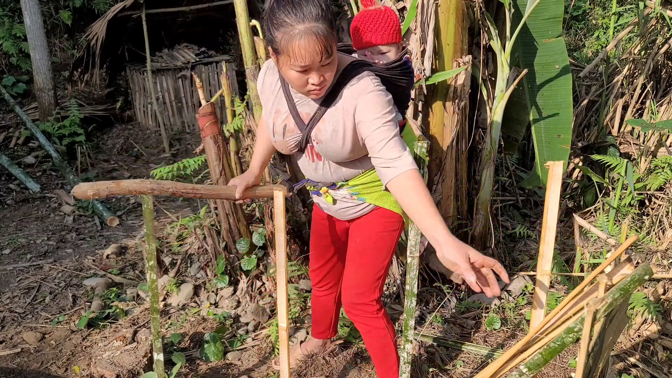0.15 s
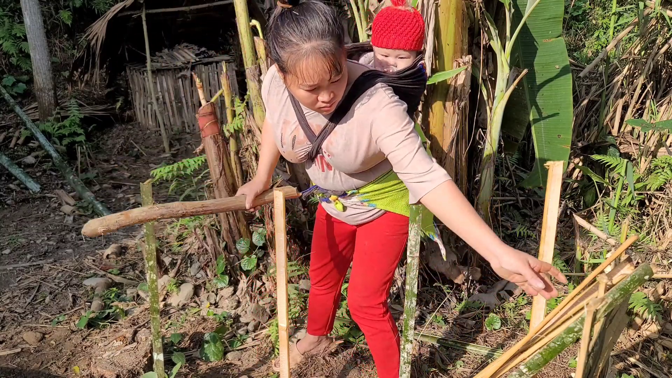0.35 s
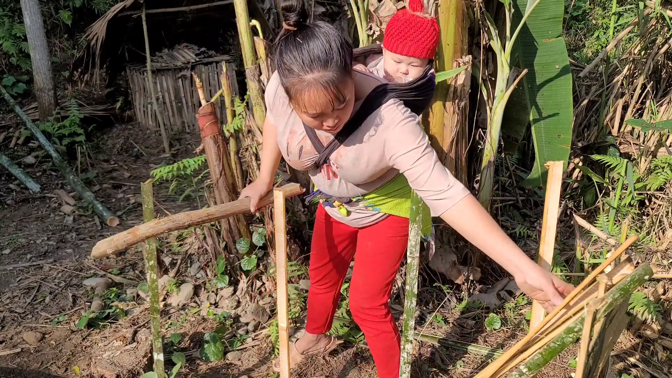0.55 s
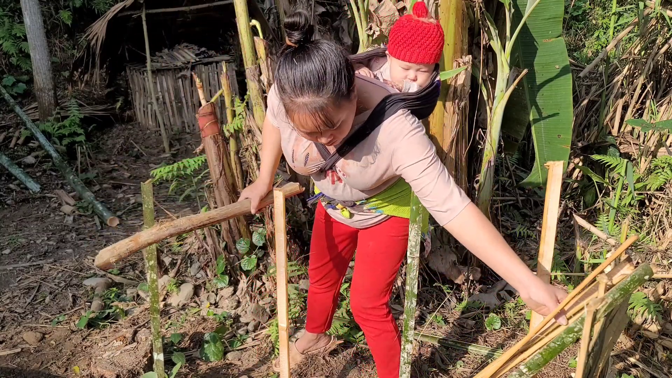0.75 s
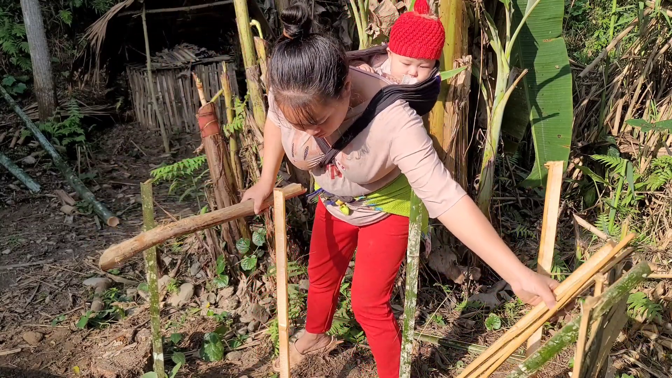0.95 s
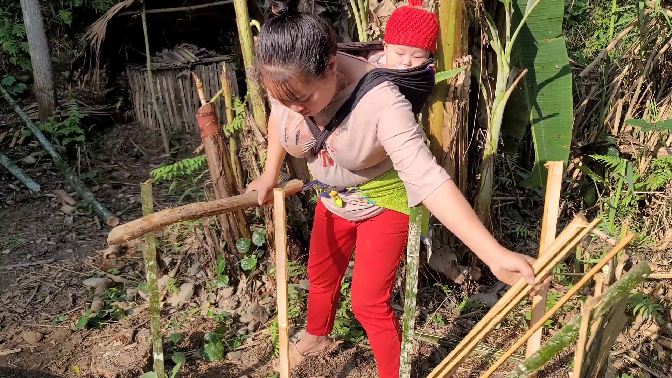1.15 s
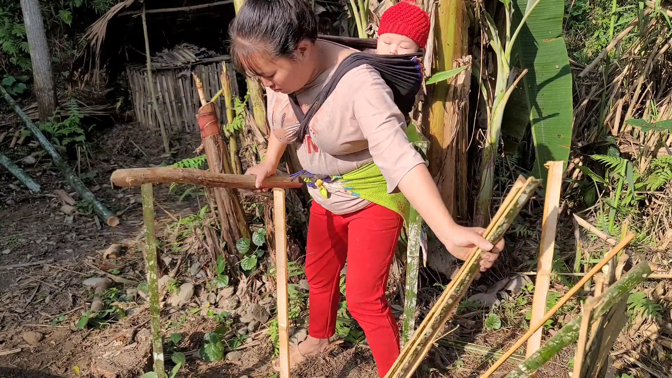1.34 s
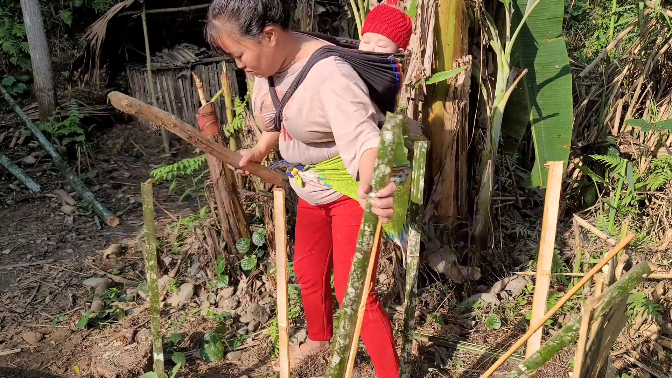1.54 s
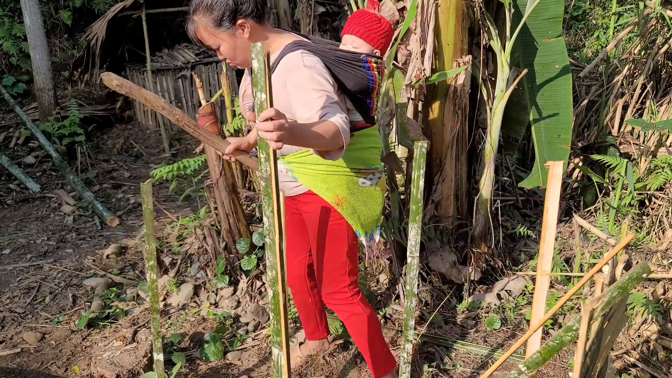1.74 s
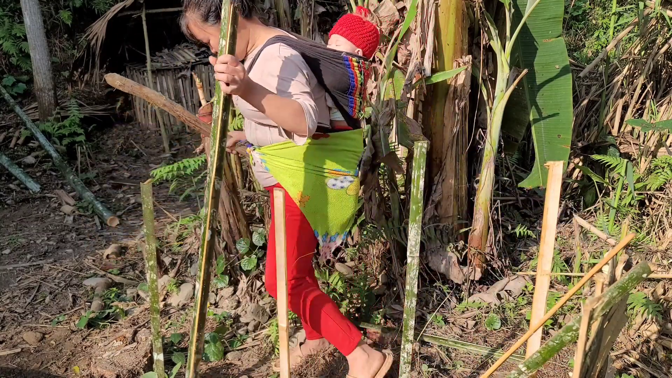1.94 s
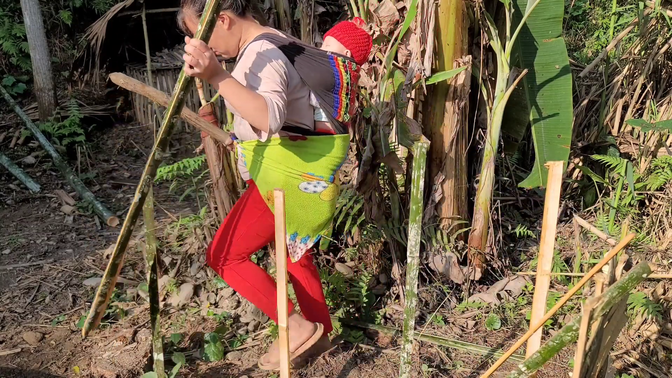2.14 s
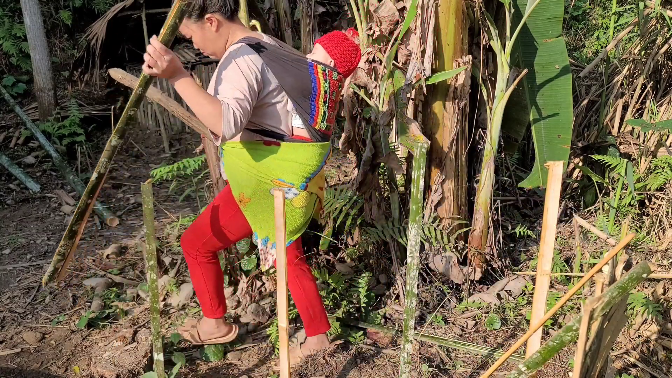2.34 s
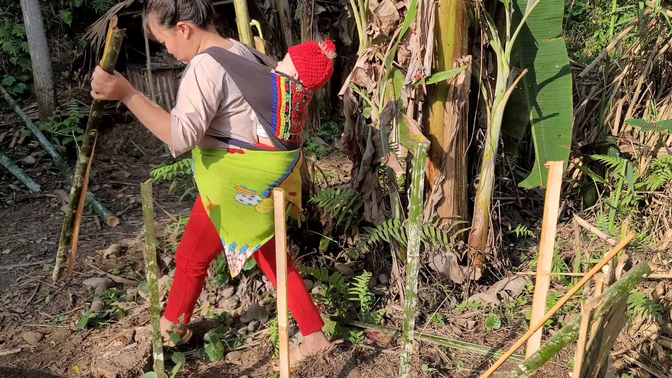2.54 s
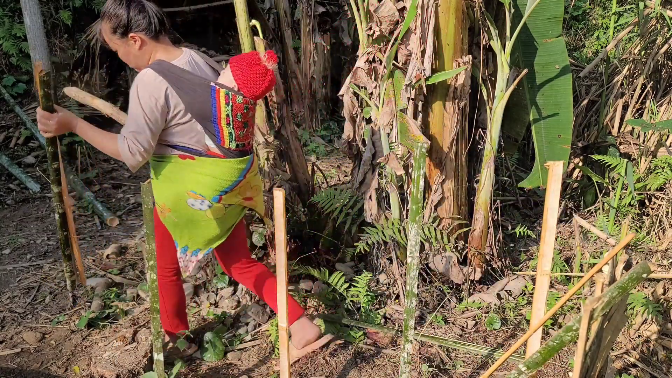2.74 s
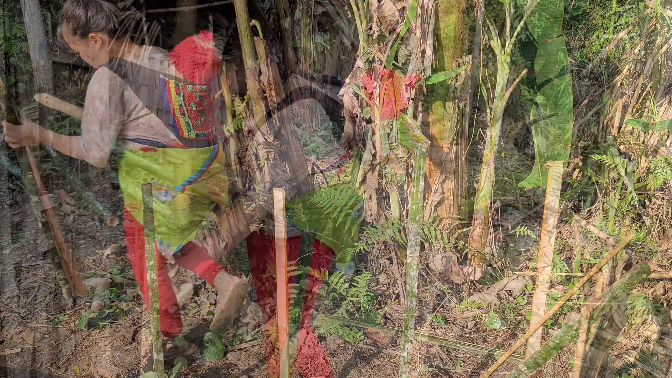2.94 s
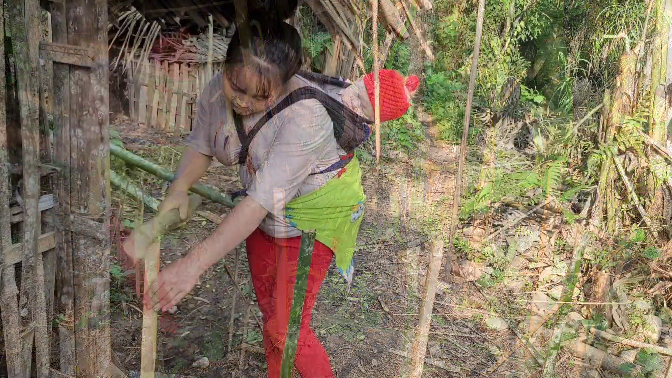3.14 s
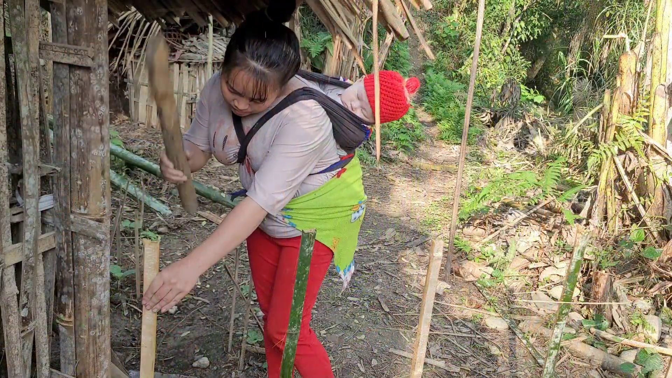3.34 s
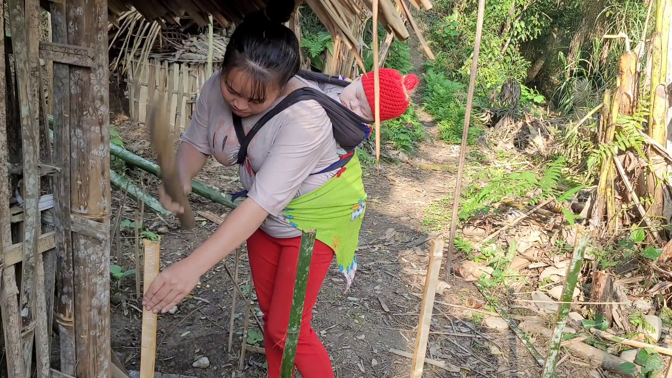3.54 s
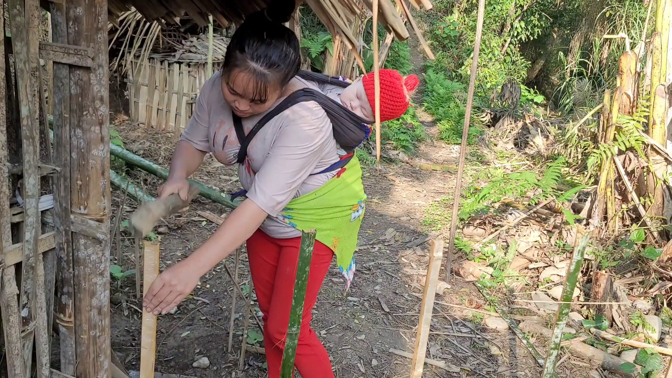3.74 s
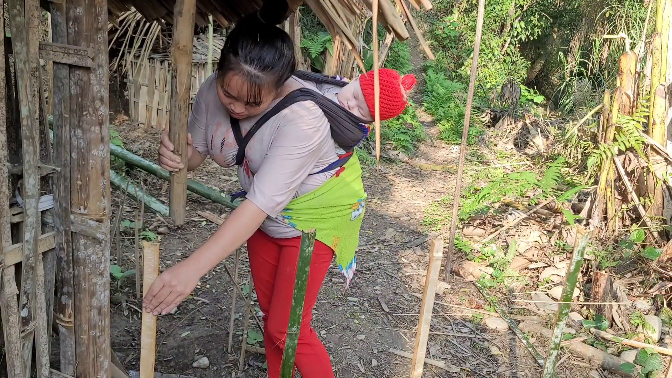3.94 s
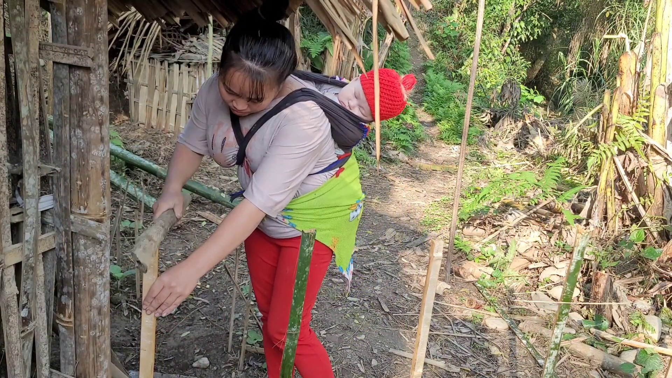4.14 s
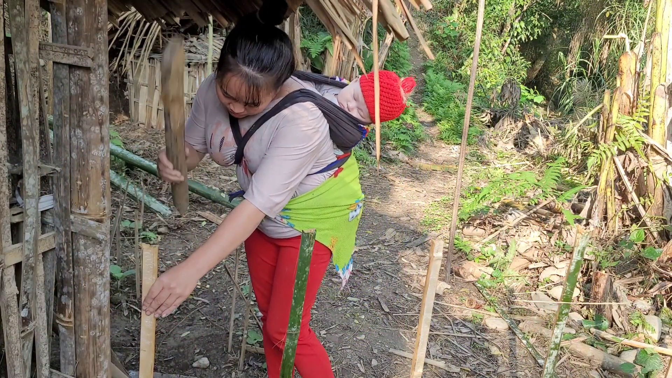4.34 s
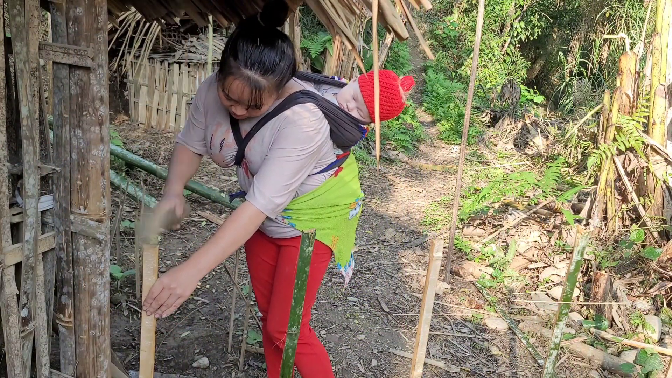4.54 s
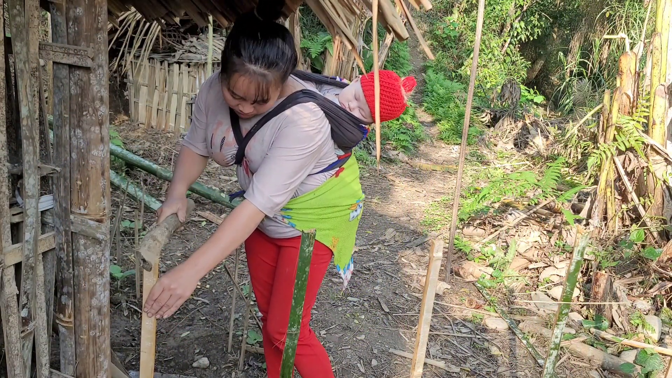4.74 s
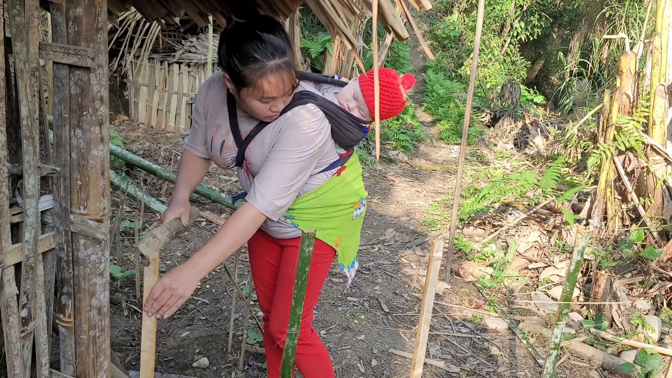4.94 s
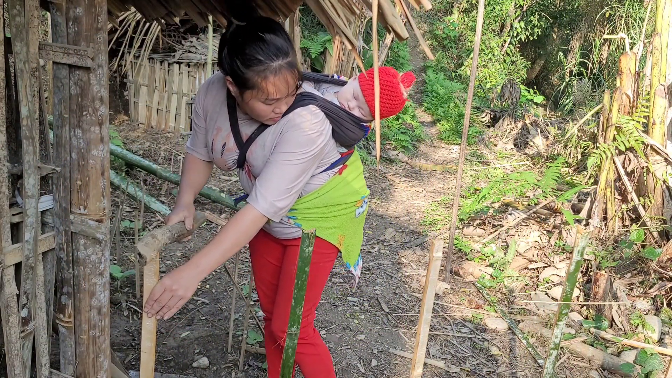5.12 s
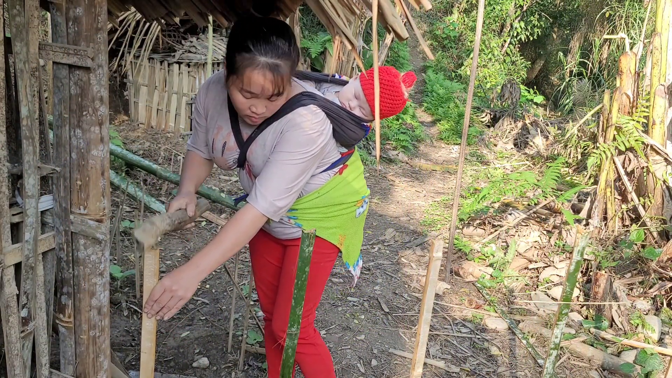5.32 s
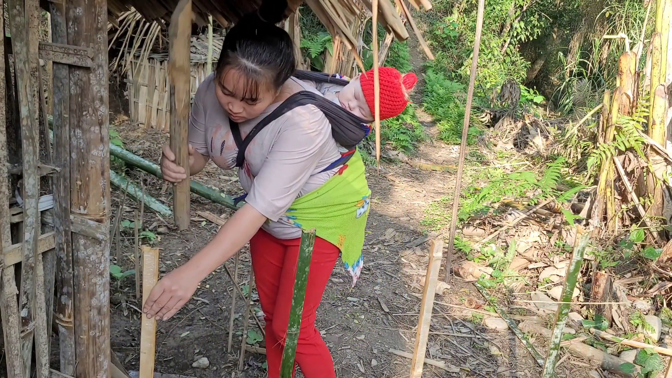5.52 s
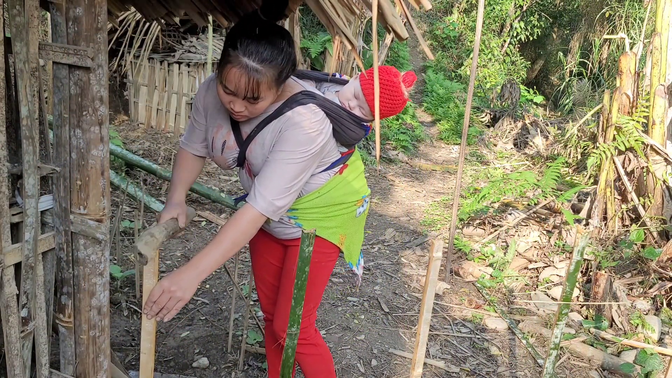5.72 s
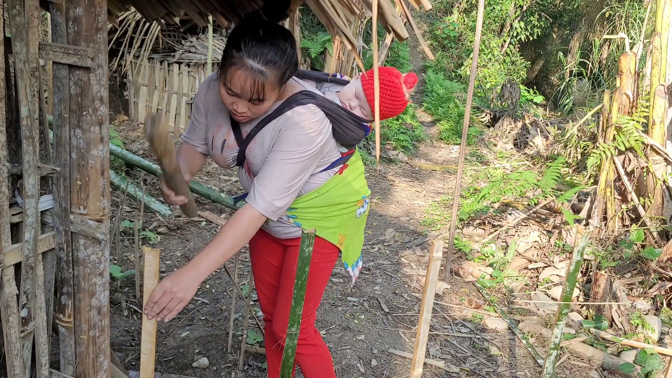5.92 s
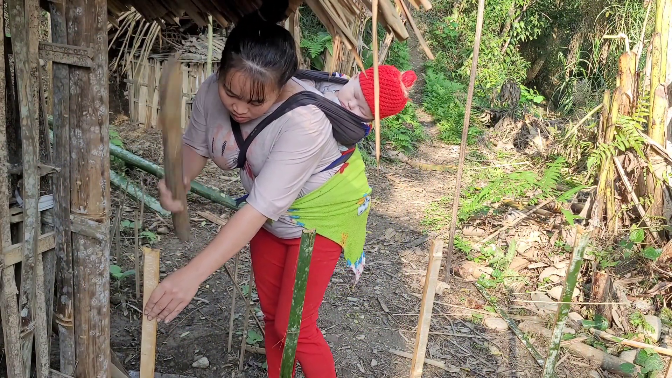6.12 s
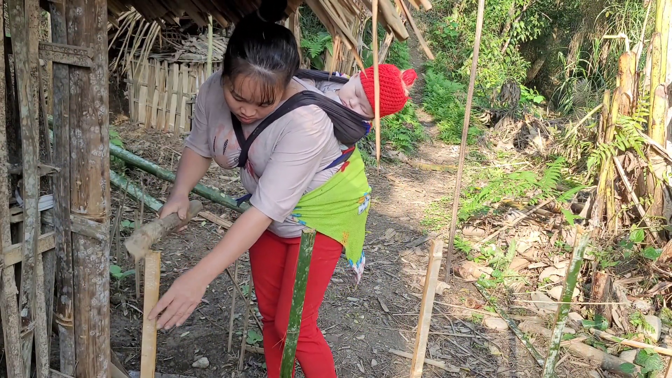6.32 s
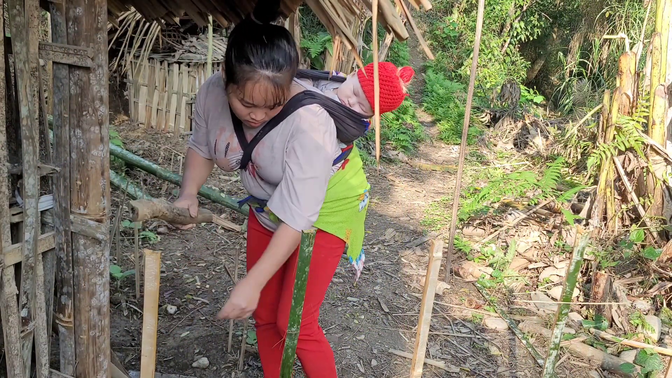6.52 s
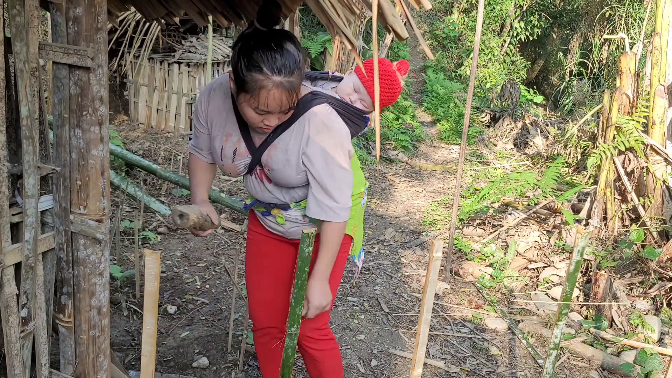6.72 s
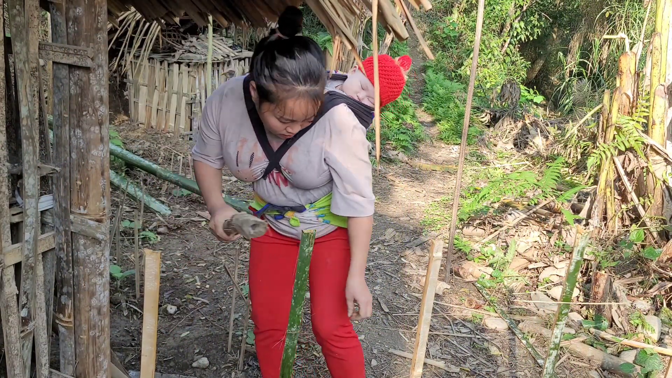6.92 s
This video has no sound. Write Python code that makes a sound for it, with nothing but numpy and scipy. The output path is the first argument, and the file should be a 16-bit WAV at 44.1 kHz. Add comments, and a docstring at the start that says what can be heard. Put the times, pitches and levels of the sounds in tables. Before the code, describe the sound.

Outdoors with thin insect shrilling, dry leaves and slats crackle lightly before four hollow club knocks, a pause, and two more.

```python
"""Beside a hut at the forest's edge, a bamboo stake is driven into the earth with a heavy wooden club.
First a slat is pulled from a pile and carried over dry leaves: noise swells, short bursts and ringing modes.
Then come six blows, four and two: deep knock, ringing modes, the stake's note, cracking fibres and reflections.
Insects shrill all the while as throbbing band noise over low air noise; faint whistled tones lie far off."""
import sys
import numpy as np
from scipy import signal
from scipy.fft import rfft, irfft, next_fast_len
from scipy.io import wavfile
from scipy.ndimage import uniform_filter1d

SR = 44100
rng = np.random.default_rng(int(sys.argv[2]) if len(sys.argv) > 2 else 0)


def materialize(psi):
    """Save the field psi as 16-bit PCM at rate SR to the path in sys.argv[1].

    A 1-D psi becomes a single channel; in a 2-D psi each row is a channel.
    """
    bounded = np.clip(np.atleast_2d(psi).T, -1, 1)
    quanta = np.round(bounded * 32767).astype(np.int16)
    wavfile.write(sys.argv[1], SR, quanta)


N = 307371
TIME = np.arange(N) / SR
AGE = np.arange(SR // 2) / SR   # s since a contact

# blows of the club: start_s, strength_db, note_hz, note_db (re strength), sharpness_db
BLOWS = [(3.049, -11.5, 1102, -10, 0.7), (3.542, -5.5, 913, -8, 0.35), (4.033, -5, 892, -1.5, 2.5),
         (4.518, -4, 904, -1, 1), (5.6864, -5, 902, -1.5, -0.1), (6.146, -6.5, 906, -7, -0.95)]


def from_db(db):
    """Decibels to gain."""
    return 10 ** (np.asarray(db) / 20)


def rms_one(x):
    """Scale to rms 1."""
    return x / np.sqrt(np.mean(x ** 2) + 1e-20)


def at_hz(points, hz, axis=1):
    """Interpolate a table column on a log-frequency axis."""
    points = np.array(points)
    return np.interp(np.log(np.maximum(hz, 1)), np.log(points[:, 0]), points[:, axis])


def dying(t60_s):
    """Exponential decay of 60 dB in t60_s."""
    return np.exp(-np.log(1000) * AGE / t60_s)


def add(out, start_s, sound):
    """Mix a sound in at start_s."""
    start = round(start_s * SR)
    out[:, start:start + sound.shape[-1]] += sound[..., :N - start]


def drift(rate_hz):
    """Random wander of rms 1: straight lines between rate_hz random knots a second."""
    knots = rng.standard_normal(4096)
    return rms_one(np.interp(TIME * rate_hz, np.arange(len(knots)), knots))


def swell(peak_s, rise_s, fade_s):
    """A smooth hump of gain, 1 at peak_s."""
    edge_db = -15.5   # one rise_s before or one fade_s after the peak
    away = np.where(TIME < peak_s, (peak_s - TIME) / rise_s, (TIME - peak_s) / fade_s)
    return from_db(edge_db * np.minimum(away, 4) ** 2)


def lean(x, pan_db):
    """Make the left channel pan_db stronger than the right."""
    return x * from_db([[pan_db / 2], [-pan_db / 2]])


def place(x, pan_db, lag_s):
    """Pan a mono sound in level and delay its right channel."""
    delayed = np.interp(AGE - lag_s, AGE, x, left=0)
    return lean(np.array([x, delayed]), pan_db)


def noise(spectrum, size=N, likeness=None):
    """Stereo noise of rms 1: the table sets its colour, mid and side shares its left-right likeness."""
    # default left-right correlation: frequency_hz, likeness (-1 to 1)
    default_likeness = [(60, 0.9), (130, 0.6), (290, 0.05), (640, -0.52), (1000, -0.51), (1400, -0.028),
                        (3100, 0), (5400, -.15), (8000, 0.11), (16000, -0.31)]
    hz = np.maximum(np.fft.rfftfreq(size, 1 / SR), 1)
    mid, side = rfft(rng.standard_normal((2, size)))
    alike = np.clip(at_hz(likeness or default_likeness, hz), -1, 1)
    pair = np.sqrt(1 + alike) * mid + np.sqrt(1 - alike) * side * [[1], [-1]]
    # fall away beyond the ends of the table
    ends = np.minimum(1, np.minimum(hz / spectrum[0][0], spectrum[-1][0] / hz)) ** 6
    return rms_one(irfft(pair * ends * from_db(at_hz(spectrum, hz)), size))


def steady(spectrum):
    """Coloured noise that lasts the whole scene."""
    return noise(spectrum, size=next_fast_len(N))[:, :N]


def ring(modes, rise_s):
    """Modes swell in and die exponentially; each excitation varies their levels and pitches a little."""
    chance = rng.standard_normal((len(modes), 2)) * [1.0, .005]   # dB, fraction of pitch
    out = np.zeros(len(AGE))
    for k, ((hz, db, t60_s), (extra_db, detune)) in enumerate(zip(modes, chance)):
        sine = np.sin(2 * np.pi * hz * (1 + detune) * AGE)
        out += (-1) ** k * from_db(db + extra_db) * dying(t60_s) * sine
    return out * (1 - np.exp(-(AGE / rise_s) ** 2))


def chirr(rate_hz, depth):
    """Three insects throb at slightly different, wandering rates; gain of rms 1."""
    rates_hz = rate_hz * (1 + .15 * rng.standard_normal(3))
    throbs = np.zeros(N)
    for insect_hz in rates_hz:
        wandering_hz = insect_hz * (1 + .08 * drift(6))
        throbs += np.sin(2 * np.pi * np.cumsum(wandering_hz) / SR)
    return rms_one(np.exp(depth * throbs))


def outdoors():
    """Air noise and insect chorus at the pile, crossfaded at the scene cut to those at the hut."""
    # noise colours: frequency_hz, relative_db
    air_pile, air_hut = [(15, -51), (25, -34.5), (40, -5.5), (64, 3.5), (119, 0.5), (158, -10.5),
                         (267, -14), (362, -4.5), (535, -6.5), (597, -3), (962, -11.5), (1300, -6.5),
                         (3040, -12.5), (4500, -14), (5850, -64.5), (9900, -120)], [(15, -54), (25, -17), (76, -1.5), (304, -26), (395, -19),
                                           (512, -20), (665, -17), (941, -28), (1330, -20.5), (1490, -28),
                                           (1660, -20.5), (2010, -25), (2610, -25.5), (3470, -26),
                                           (4500, -26), (5850, -63.5), (9900, -120)]
    insects_pile, insects_hut = [(4300, -22.5), (4750, -22), (5000, -12), (5280, -1), (5520, -1),
                                 (5750, -14.5), (6030, -12.5), (6600, -24.5), (8000, -31.5), (9500, -39),
                                 (11000, -34), (12500, -40.5), (16000, -57.5)], [(4300, -25.5), (4750, -20), (5000, -6), (5230, 0),
                                                       (5480, 1.5), (5680, -4.5), (5850, -13.5),
                                                       (6400, -23), (7300, -22.5), (9300, -35),
                                                       (11000, -31), (12500, -36.5), (16000, -37.5)]
    # chorus level before the gain of each place: time_s, level_db
    chorus_curve = [(0.0, -59.5), (0.21, -58.5), (1.96, -57.5), (2.33, -57.5), (3.03, -62), (4.08, -61),
                    (4.76, -62), (6.97, -62)]
    air_pile_db, air_hut_db = -70, -66
    insects_pile_db, insects_hut_db = 2, 3   # re chorus level
    cut_s, crossfade_s = 3.084, 0.23
    past_cut = np.clip((TIME - cut_s) / crossfade_s + .5, 0, 1)
    chorus_db = np.interp(TIME, *np.transpose(chorus_curve))
    shrill = from_db(chorus_db + .9 * drift(25)) * chirr(rate_hz=50, depth=0.055)
    pile = from_db(air_pile_db) * steady(air_pile)
    pile = pile + from_db(insects_pile_db) * shrill * steady(insects_pile)
    hut = from_db(air_hut_db) * steady(air_hut)
    hut = hut + from_db(insects_hut_db) * shrill * steady(insects_hut)
    return np.sqrt(1 - past_cut) * lean(pile, pan_db=-2.4) + np.sqrt(past_cut) * lean(hut, pan_db=-2.0)


def tone(hz, waver, flutter_db, waver_rate_hz=100):
    """A sine whistle, unsteady in pitch and level, that reaches the right channel later."""
    lag_s = .00026
    phase = 2 * np.pi * np.cumsum(hz * (1 + waver * drift(waver_rate_hz))) / SR
    pair = np.sin([phase, phase - 2 * np.pi * hz * lag_s])
    return from_db(flutter_db * drift(32)) * np.sqrt(2) * pair


def far_chirp():
    """A thin high chirp arches in pitch and level."""
    peak_s, edge_s, top_hz, drop_hz, level_db = .48, 0.13, 11030, 300, -76.5
    arch = swell(peak_s, edge_s, edge_s)
    return from_db(level_db) * arch * tone(top_hz - drop_hz * (1 - arch), waver=.006, flutter_db=1.0)


def far_tones():
    """A faint whine and a lower hum swell and fade while their pitch sinks."""
    # peak_s, rise_s, fade_s, pitch_hz (at the peak), sag_hz_per_s, level_db
    tone_rows = [(3.9, 1.1, 2.8, 1425, 62, -76.5), (3.6, 1.5, 1.5, 750, 15, -82.5)]
    out = np.zeros((2, N))
    for peak_s, rise_s, fade_s, hz, sag, db in tone_rows:
        sinking_hz = hz - sag * (TIME - peak_s)
        out += from_db(db) * swell(peak_s, rise_s, fade_s) * tone(sinking_hz, waver=.016, flutter_db=5.0)
    return out


def peeps():
    """Brief faint peeps from the forest, each a wavering whistle that falls in pitch."""
    # peak_s, pitch_hz (at the peak), level_db
    peep_rows = [(.47, 2300, -78), (2.26, 2200, -67), (3.47, 2920, -72.5), (5.34, 1605, -69),
                 (5.89, 2570, -71), (6.57, 2640, -65), (6.9, 1600, -72)]
    rise_s, fade_s, sag_hz_per_s = 0.031, 0.057, 7300
    out = np.zeros((2, N))
    for peak_s, hz, db in peep_rows:
        falling_hz = hz - sag_hz_per_s * (TIME - peak_s)
        whistle = tone(falling_hz, waver=.06, flutter_db=3.0, waver_rate_hz=500)
        out += from_db(db) * swell(peak_s, rise_s, fade_s) * whistle
    return out


def rustle():
    """With each movement dry leaves and slats crackle unevenly; feet and clothes scuff below them."""
    # noise colours: frequency_hz, relative_db
    crisp_colour, scuff_colour = [(2500, -11), (5000, -3), (7500, -2), (10000, -14), (15000, -12)], [(300, 4.5), (900, -3.5), (1400, 3), (2200, -1), (4500, -3),
                                                 (7000, -5)]
    # movements: peak_s, rise_s, fade_s, crisp_db, scuff_db
    move_rows = [(.07, 0.24, 0.11, -75, -73), (.62, 0.66, 0.096, -80, -66.5),
                 (.82, 0.15, 0.07, -65.5, -68.5), (1.17, 0.27, 0.12, -70, -70.5),
                 (1.36, 0.051, 0.097, -57.5, -69.5), (1.43, 0.03, .25, -74, -67.5),
                 (1.86, 0.67, 0.23, -84, -70), (2.35, 0.37, 0.39, -80, -70.5),
                 (2.63, 0.05, 0.066, -63, -69), (2.769, 0.061, .13, -71, -67.5),
                 (6.57, 0.024, 0.2, -81, -73), (6.89, .18, 0.24, -78, -67)]
    crisp = steady(crisp_colour) * rms_one(from_db(5.0 * drift(500)))
    scuff = steady(scuff_colour) * rms_one(from_db(2.0 * drift(200)))
    out = np.zeros((2, N))
    for peak_s, rise_s, fade_s, crisp_db, scuff_db in move_rows:
        both = from_db(crisp_db) * crisp + from_db(scuff_db) * scuff
        out += swell(peak_s, rise_s, fade_s) * both
    return out


def taps():
    """Knocks and snaps of slats and twigs: noise bursts round a pitch, with a faint tail from around."""
    # start_s, level_db, pitch_hz, width_octaves, t60_s
    tap_rows = [(0.79, -47, 825, 1.5, 0.071), (0.7931, -40.5, 2350, 0.83, 0.029),
                (0.82, -55, 11100, 0.26, 0.014), (.863, -60.5, 9000, 1, 0.0091),
                (1.334, -65, 8000, .7, .02), (1.416, -54.5, 4970, 1.2, 0.073),
                (1.549, -61.5, 10100, 0.44, 0.0078), (1.824, -62, 5000, 1.9, 0.026),
                (2.364, -57, 3000, 1.3, 0.027), (2.603, -57.5, 1000, 1.03, 0.41),
                (3.667, -59, 6940, 1.5, 0.014), (5.265, -61, 2980, 1.5, 0.024),
                (6.235, -58, 8000, 0.91, 0.011), (6.862, -61, 5000, 1.43, 0.026)]
    out = np.zeros((2, N))
    for start_s, db, hz, width, t60_s in tap_rows:
        colour = [(hz * 2 ** (k * width), -6 * k * k) for k in (-2, -1, 0, 1, 2)]
        envelope = dying(t60_s) + from_db(-14) * dying(0.3)
        add(out, start_s, from_db(db) * noise(colour, size=len(AGE)) * envelope)
    return out


def slat():
    """Slats and sticks touch: a free length of bamboo rings briefly on one mode."""
    # start_s, level_db, pitch_hz, t60_s
    ring_rows = [(.66, -59, 1245, 0.053), (1.461, -44, 1920, 0.02), (1.545, -55.5, 1164, 0.085),
                 (2.729, -59, 1380, 0.082), (2.818, -57, 1700, 0.027)]
    out = np.zeros((2, N))
    for start_s, db, hz, t60_s in ring_rows:
        note = ring([(hz, db, t60_s)], rise_s=0.0011)
        add(out, start_s, place(note, pan_db=-5.0, lag_s=.00003))
    return out


def scatter(build_s, ragged_db):
    """Diffuse tail from hut, ground and plants: it builds up in milliseconds, dies unevenly band by band."""
    # frequency_hz, relative_db, t60_s
    tail_bands = [(45, -1.5, 0.31), (130, -2, .18), (308, -4.5, 0.2), (444, 3, 0.22), (594, -3, 0.2),
                  (830, -1.5, 0.1654), (1080, -11, 0.2), (1550, -12, 0.16), (1716, -3.5, 0.1),
                  (1992, -11.5, 0.13), (4050, -20, 0.16), (7050, -25, 0.13), (10025, -34, .15),
                  (16000, -42, 0.13)]
    edges_hz = np.geomspace(30, 17000, 25)
    bins_hz = np.fft.rfftfreq(len(AGE), 1 / SR)
    spectrum = rfft(noise(tail_bands, size=len(AGE)))
    lumps = uniform_filter1d(rng.standard_normal((len(edges_hz), len(AGE))), size=300, mode="wrap")
    tail = np.zeros((2, len(AGE)))
    for low, high, lump in zip(edges_hz, edges_hz[1:], lumps):
        band = irfft(spectrum * ((bins_hz >= low) & (bins_hz < high)), len(AGE))
        decay = dying(at_hz(tail_bands, np.sqrt(low * high), axis=2))
        tail += band * decay * rms_one(from_db(ragged_db * rms_one(lump)))
    return tail * (1 - np.exp(-(AGE / build_s) ** 2))


def yard(direct):
    """What comes back after each blow: diffuse scatter, a lingering hollow ring and an echo off the hut."""
    # hollow ring: frequency_hz, level_db, t60_s
    hollow_modes = [(379, -40.5, .29), (440, -41, .29)]
    # echo off a wall of the hut: delay_s, left_db, right_db
    echo_rows = [(0.042, -33, -25.5)]
    scatter_db = -16   # re strength
    out = np.zeros((2, N))
    for start_s, strength_db, *_ in BLOWS:
        tail = from_db(scatter_db) * scatter(build_s=0.003, ragged_db=1.3)
        hollow = place(ring(hollow_modes, rise_s=0.017), pan_db=1.0, lag_s=.0004)
        add(out, start_s, from_db(strength_db) * (tail + hollow))
    for delay_s, left_db, right_db in echo_rows:
        add(out, delay_s, direct * from_db([[left_db], [right_db]]))
    return out


def thump(centre_s, hz):
    """The stake lurches into the soil and stops: the inverted second derivative of a smooth push."""
    u = (np.pi * hz * (AGE - centre_s)) ** 2
    return (1 - 2 * u) * np.exp(-u)


def crunch(contact_s, t60_s, grain_db):
    """Crushed fibres crunch as grainy noise, held for the contact and then dying."""
    # colour: frequency_hz, relative_db
    fibre_colour = [(800, -0.5), (2200, 4), (2700, -10), (3300, -4), (4200, -2), (5600, -4), (7200, -8.5),
                    (9000, -15.5), (11000, -25), (16000, -19.5)]
    # left-right correlation: frequency_hz, likeness (-1 to 1)
    fibre_likeness = [(1000, 0.32), (2500, -.5), (7000, -.25), (12000, -0.12)]
    wander = uniform_filter1d(rng.standard_normal(len(AGE)), size=16) * np.sqrt(16)
    grains = rms_one(from_db(grain_db * wander))
    hold = np.minimum(1, dying(t60_s) * np.exp(np.log(1000) * contact_s / t60_s))
    onset = 1 - np.exp(-AGE / 0.0007)
    return noise(fibre_colour, size=len(AGE), likeness=fibre_likeness) * grains * hold * onset


def blows():
    """Each blow: a deep knock into the ground, body modes, the stake's note, bamboo clack and fibre crack."""
    # modes of stake and club, and of the bamboo wall: frequency_hz, relative_db, t60_s
    body_modes, wall_modes = [(55, -24, 0.17), (111, -11, .126), (179.3, -2.5, .068), (225, -2.5, 0.032),
                              (353.6, 3.5, 0.015), (397.6, 9, 0.023), (511, 0.5, 0.05), (412, -13.5, .16),
                              (596.4, -1.5, 0.044), (706.4, -2, 0.0422)], [(1115, 18.5, 0.022), (1310, 1, 0.07), (1360, 8, 0.04),
                                                  (1507, 1.5, 0.06), (1782, 15, 0.041), (1723, -2, .14),
                                                  (2153, 3, 0.04), (2450, -4, 0.035), (3380, -1.5, 0.092),
                                                  (3428, -2, 0.039), (4047, -3.5, .035)]
    ground_db, body_db, clack_db, crack_db = -3.5, -7, -24, -19   # re strength
    thump_trade = 0.3   # dB of knock lost per dB of sharpness
    out = np.zeros((2, N))
    for start_s, strength_db, note_hz, note_db, sharp_db in BLOWS:
        ground = from_db(ground_db - thump_trade * sharp_db) * thump(centre_s=0.00622, hz=272.8)
        body = from_db(body_db) * ring(body_modes, rise_s=0.0026)
        note = ring([(note_hz, note_db, .035)], rise_s=0.0024)
        wall = from_db(clack_db + sharp_db) * ring(wall_modes, rise_s=0.0022)
        crack = from_db(crack_db + sharp_db) * crunch(contact_s=0.0085, t60_s=.035, grain_db=3.5)
        blow = place(ground, pan_db=-3.0, lag_s=.00005)
        blow = blow + place(body, pan_db=0.0, lag_s=0.00031)
        blow = blow + place(note, pan_db=5.0, lag_s=0.00019)
        blow = blow + place(wall, pan_db=0.7, lag_s=0.00018)
        blow = blow + lean(crack, pan_db=0.75)
        add(out, start_s, from_db(strength_db) * blow)
    return out


def scene():
    """The surroundings, the work and its reflections."""
    direct = blows()
    distant = outdoors() + far_chirp() + far_tones() + peeps()
    return distant + rustle() + taps() + slat() + yard(direct) + direct


def record(dry):
    """Shed the deepest bass, dip a narrow band on the right, round the highest peaks, cut the top."""
    dip_hz, dip_q, dip_db = 8340, 4, -6
    ceiling, cutoff_hz = .85, 16000
    left, right = signal.sosfilt(signal.butter(3, 33, "high", fs=SR, output="sos"), dry)
    band = signal.lfilter(*signal.iirpeak(dip_hz, dip_q, fs=SR), right)
    pair = np.array([left, right + (from_db(dip_db) - 1) * band])
    rounded = pair / (1 + (pair / ceiling) ** 6) ** (1 / 6)
    return signal.sosfilt(signal.ellip(10, .1, 80, cutoff_hz, fs=SR, output="sos"), rounded)


dry = scene()
out = record(dry)
materialize(out)
```